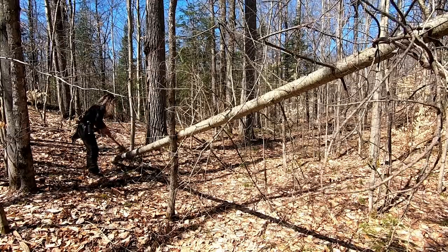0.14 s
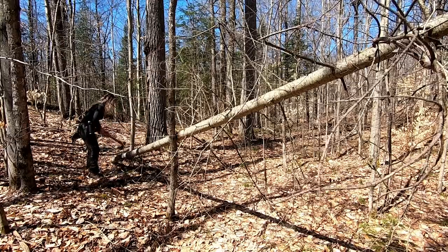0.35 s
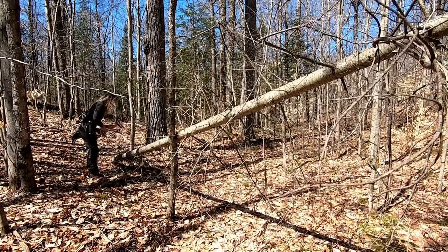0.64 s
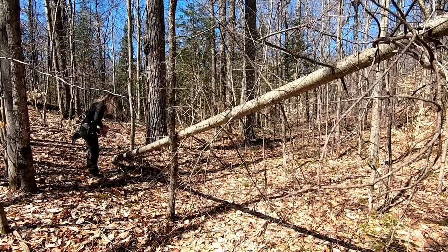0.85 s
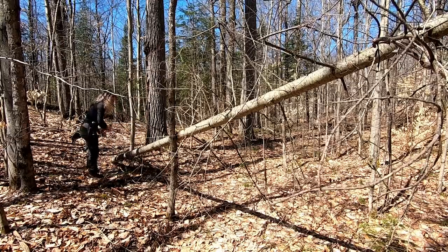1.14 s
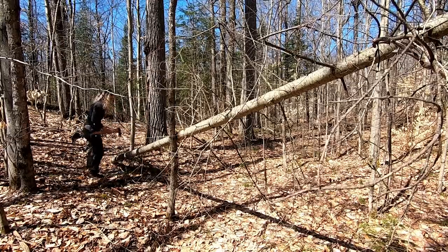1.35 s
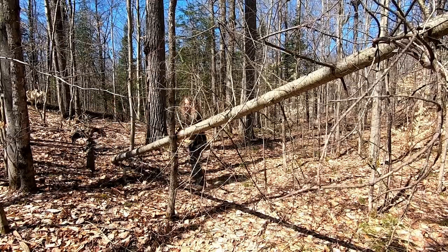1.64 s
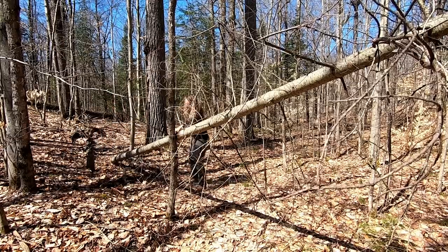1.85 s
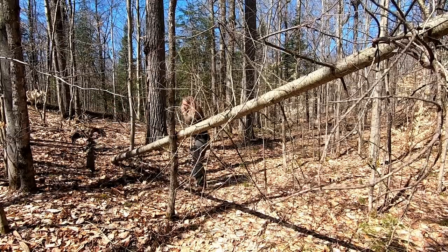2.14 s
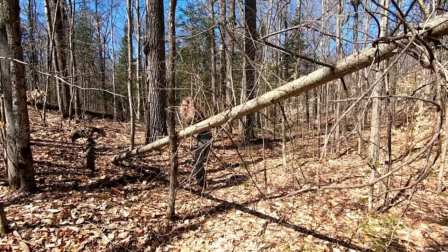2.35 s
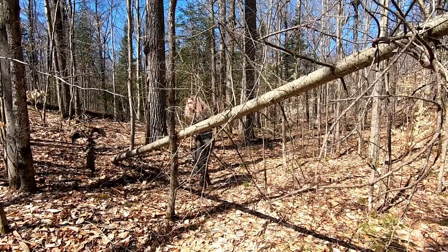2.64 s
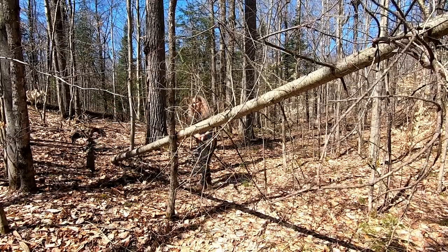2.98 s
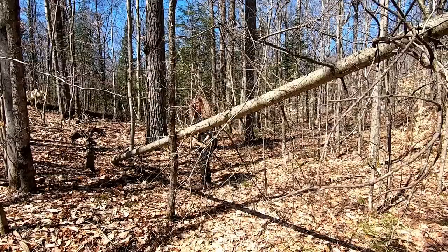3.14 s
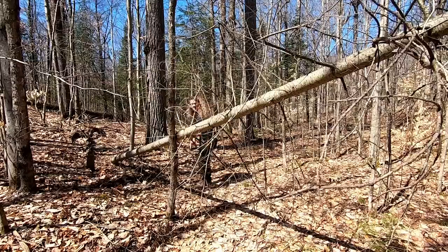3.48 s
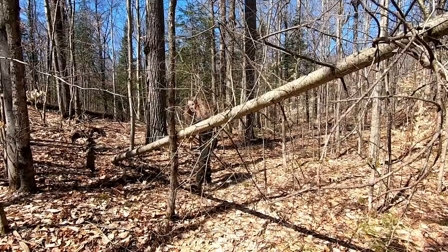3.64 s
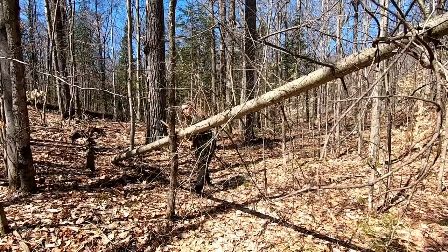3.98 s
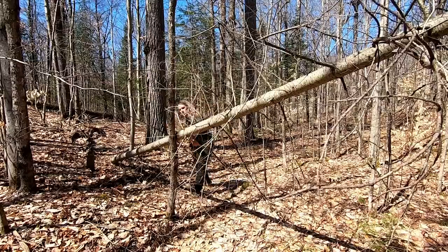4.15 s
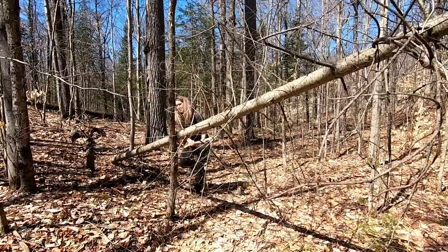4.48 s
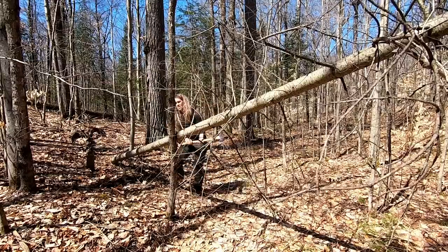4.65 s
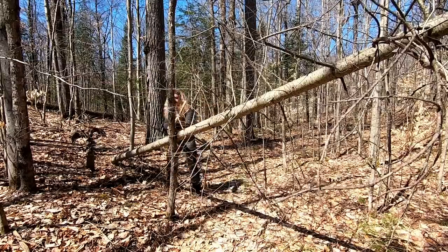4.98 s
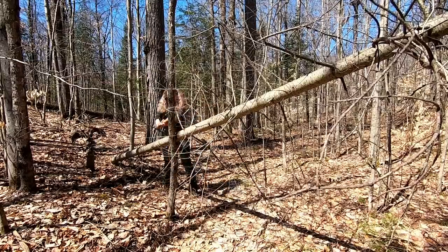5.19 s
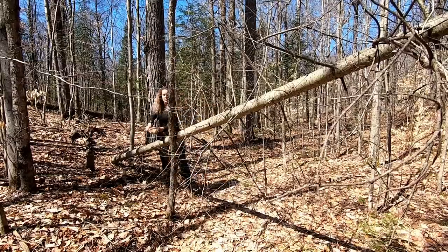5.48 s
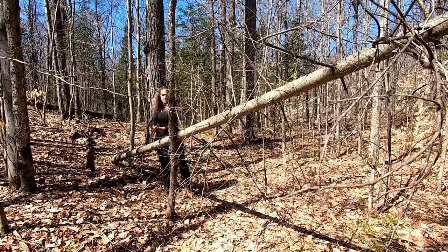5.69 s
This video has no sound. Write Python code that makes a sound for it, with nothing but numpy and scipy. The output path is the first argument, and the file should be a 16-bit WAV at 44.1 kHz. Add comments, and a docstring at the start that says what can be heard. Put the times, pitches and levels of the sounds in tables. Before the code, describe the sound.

In bare woods, a long dead tree is dragged through brush some metres from a stereo microphone. At 0.1 seconds a branch springs with a hollow pop and splinters, scattering briefly off ground and trunks. Leaf litter crunches and twigs tick, thinning to near quiet around 1 to 1.4 seconds. At 1.5 a crisp rustle and low wind enter; at 1.95 comes the loudest snap, hard, bright and clipped, leaving a faint thin high ring. Gusts rumble and thump toward the left from about 2 to 3.7 seconds while leaves keep scraping. A duller double crack lands at 2.74. Rustling eases near 3.8, then a lower crack with a woody shudder and trailing splinters comes at 4.32. Leaf crunch swells around 4.9, and a final cluster of snaps and tearing runs from 5.3 to 5.5, over rustling leaves and light wind to the end at about 5.8.

```python
"""A long dead tree is dragged through brush in bare woods, some metres from the microphones.
At once a branch springs and splinters; then twigs tick and leaf litter crunches under trunk and boots.
Near two seconds comes the loudest snap, a thin high ring after it; gusts buffet the two microphone ports.
More branches give way until the end. Damped swings make the pops, runs of impulses the tearing wood,
tiny grains the leaves and filtered noise the wind; ground and standing trunks scatter each snap."""
import sys
import numpy as np
from scipy import signal
from scipy.io import wavfile
from scipy.ndimage import uniform_filter1d

SR = 44100
rng = np.random.default_rng(int(sys.argv[2]) if len(sys.argv) > 2 else 0)


def waveform_to_disk(signal):
    """Save audio, clipped to [-1, 1], as 16-bit WAV at the path in sys.argv[1]."""
    frames = np.transpose(np.atleast_2d(signal))
    scaled = np.clip(frames, -1, 1) * 32767
    samples = np.round(scaled).astype(np.int16)
    wavfile.write(sys.argv[1], SR, samples)


N = 256662
TIME = np.arange(N) / SR


def gain_of(db):
    """Logarithmic level: decibels become an amplitude factor."""
    return 10 ** (np.asarray(db) / 20)


def evened(x):
    """Normalization: scales to an rms of 1."""
    return x / np.sqrt(np.mean(x ** 2) + 1e-20)


def read(points, hz):
    """Interpolation of a table along a logarithmic frequency axis."""
    f, value = np.transpose(points)
    return np.interp(np.log(hz + 1), np.log(f + 1), value)


def coloured(x, points):
    """Minimum-phase filtering: the Hilbert transform of the log gain supplies the phase of a causal filter."""
    size = 4096
    gain_db = read(points, abs(np.fft.fftfreq(size, 1 / SR)))
    log_gain = np.log(gain_of(gain_db))
    response = np.exp(np.conj(signal.hilbert(log_gain)))
    taps = np.fft.ifft(response).real[:size // 2]
    return np.apply_along_axis(lambda v: signal.oaconvolve(v, taps)[:len(v)], -1, x)


def panned(x, pan_db):
    """Interaural level difference: positive leans left, the mean of the two gains stays 1."""
    sides = gain_of(np.array([[.5], [-.5]]) * pan_db)
    return x * sides / sides.mean(0)


# spectrum of the side signal against the middle in scattered sound: frequency_hz [Hz], level_db [dB]
WIDTH = [(100, -23), (400, -17.5), (800, -3.5), (1300, -3), (3000, -8.5), (5500, -4), (8000, 3), (15000, 2)]


def widened(pair):
    """Decorrelation: two unrelated signals become a left and right that differ most in the treble."""
    middle, side = pair[0], coloured(pair[1], WIDTH)
    return np.array([middle + side, middle - side])


def add(mix, s, sound):
    """Superposition: mixes a sound in at its time."""
    part = mix[:, max(round(s * SR), 0):][:, :sound.shape[-1]]
    part += sound[..., :part.shape[1]]


def flick(t, hz, rise):
    """Damped oscillation: a sine whose envelope swells to 1 at the rise time and soon dies."""
    envelope = (t / rise * np.exp(1 - t / rise)) ** 2
    return envelope * np.sin(2 * np.pi * hz * t)


# sticks that give way and spring back:
# start_s [s], level_db [dB, envelope peak], pitch_hz [Hz], rise_ms [ms], left_over_right_db [dB]
SNAPS = [(0.075, -14.5, 1430, 0.33, -4), (0.0786, -7, 1054, 1.06, -5), (0.866, -39.5, 3680, 1.1, 4.5),
         (1.948, -16, 4400, 0.82, -2), (1.9513, -8, 1440, 0.2, 0), (1.954, 2.5, 4780, 0.16, 0),
         (1.9553, -2.5, 5450, 0.17, -6), (2.7387, -14.5, 795, 1.13, -2.5), (2.74, -19, 1287, 2.8, -7.5),
         (4.3216, -13, 854, 1.8, -4), (4.323, -17, 1303, 1.2, -10), (5.3102, -39, 4337, 0.33, 0),
         (5.3773, -19, 1100, 0.69, -5), (5.382, -10, 1035, 0.73, -3)]


def snaps():
    """Elastic release: each stick springs back with one short, heavily damped pop."""
    out, t = np.zeros((2, N)), np.arange(SR // 20) / SR
    for s, db, hz, rise_ms, pan_db in SNAPS:
        pop = gain_of(db) * flick(t, hz, rise_ms / 1000)
        add(out, s, panned(pop, pan_db))
    return out


# spectrum of breaking wood: frequency_hz [Hz], level_db [dB]
WOOD = [(150, 5.5), (480, 5), (850, 1.5), (1050, 1.5), (1250, -1.5), (1800, -2.5), (2400, -2), (3100, -2),
        (5500, -2), (9500, -6.5), (11500, -17), (16000, -30)]


def fracture(length, hz, treble_db, focus_db, fibres_per_s, grit, ring_db, stragglers, size=4096, count=110):
    """Brittle fracture: fibre impulses swell and thin out, filtered by the stick; loudest rms 1 at the middle."""
    t = np.arange(size) / SR
    breaks = (rng.random(size) < fibres_per_s / SR) * rng.uniform(0.2, 1, size)
    breaks[0] = 1.67  # the first break is the strongest
    fade = (1 - 0.5 * np.exp(-3 * t / length)) / (1 + (t / length) ** 3)
    # the last fibres part, about 500 a second at first
    late = stragglers * (rng.random(size) < 500 / SR) * rng.random(size) * np.exp(-t / 0.029)
    impulses = (breaks * fade + late) * rng.choice([-1, 1], (2, size))
    run = impulses + grit * fade * rng.standard_normal((2, size))

    # a narrow resonance on a slope that falls away from the stick's pitch
    f = np.geomspace(50, SR / 2, 200)
    octaves = abs(np.log2(f / hz))
    stick_db = ring_db / (1 + (octaves / 0.098) ** 2) - focus_db * octaves
    shape_db = read(WOOD, f) + stick_db + treble_db / (1 + (6000 / f) ** 4)
    sound = widened(coloured(run, np.transpose([f, shape_db])))
    loudest = np.sqrt(uniform_filter1d(sound.mean(0) ** 2, count).max())
    return sound / loudest


# wood fibres tearing in quick runs: start_s [s], level_db [dB, loudest rms], run_ms [ms],
# centre_hz [Hz], treble_db [dB], left_over_right_db [dB]
SPLINTERS = [(0.0837, -18.5, 2.7, 3400, 9, -1), (0.2244, -31.5, 3.7, 3620, 10.5, 4),
             (1.625, -32.5, 2.8, 1560, -13, 2), (1.955, -20.5, 1.8, 4600, 0.5, -4),
             (2.721, -34, 10.2, 2496, 0, -1), (2.738, -28, 2.86, 1593, -6, 0),
             (2.743, -23.5, 13.7, 1240, -11, -1), (2.7440, -19, 3.3, 4400, -1.5, -5),
             (4.32, -27, 7.6, 2000, -12.5, 4), (4.324, -16.5, 6.3, 3150, -6, -3.5),
             (4.3378, -28.5, 17.4, 3060, 2, 0), (4.3814, -28, 4.3, 2030, -3, -3),
             (4.3877, -24, 3.1, 3450, 4, -1), (4.7510, -30.5, 5.9, 3470, -2.5, -4.5),
             (4.9573, -25.5, 3.5, 3050, 2.5, -4), (5.197, -35.5, 3.8, 3460, 3, -1.5),
             (5.3087, -24.5, 2.4, 4900, -3.5, -1), (5.3826, -16.5, 5.4, 2500, 0, -1),
             (5.469, -21.5, 4.4, 3440, -6, 0.5), (5.4777, -21, 5.4, 3420, -1, -2),
             (5.4908, -25.5, 6.5, 3450, 2, -1)]


def splinters():
    """Progressive fracture: the fibres of a branch tear one after another."""
    out = np.zeros((2, N))
    for s, db, run_ms, hz, treble_db, pan_db in SPLINTERS:
        tear = fracture(run_ms / 1000, hz, treble_db, focus_db=3.5, fibres_per_s=4600,
                        grit=0.0807, ring_db=4, stragglers=0.23)
        add(out, s, panned(gain_of(db) * tear, pan_db))
    return out


# times when a broken limb shudders: start_s [s], level_db [dB, before the decay]
SHUDDERS = [(0.081, -30.5), (1.951, -35), (2.741, -36), (4.327, -23.5), (4.389, -37), (4.956, -40.5),
            (5.382, -35), (5.474, -36.5)]
# spectrum of the shaking limb: frequency_hz [Hz], level_db [dB]
LIMB = [(40, -21.5), (110, 7), (220, 6.5), (330, 4.5), (520, -16), (820, -17), (1020, -25), (1230, -10),
        (1600, -18.5), (2600, -20.5), (3100, -4), (3900, -15.5), (8000, -38)]


def shudders():
    """Damped vibration: a broken limb shakes with a dull knock that falls 60 dB in 0.2 s."""
    out, t = np.zeros((2, N)), np.arange(SR // 2) / SR
    for s, db in SHUDDERS:
        knock = evened(widened(coloured(rng.standard_normal((2, len(t))), LIMB)))
        onset = 1 - np.exp(-t / .0015)
        add(out, s, gain_of(db - 60 * t / 0.2) * onset * knock)
    return out


# the thin ring after the sharpest snap, one row:
# start_s [s], level_db [dB, before the decay], centre_hz [Hz], width_hz [Hz], t60_s [s]
RING = (1.955, -50, 8300, 110, .6)


def ring():
    """Narrow-band noise: a wavering high tone with exponential decay."""
    s, db, hz, width, t60 = RING
    t = np.arange(SR // 2) / SR
    band = signal.butter(2, [hz - width / 2, hz + width / 2], "band", fs=SR, output="sos")
    tone = evened(signal.sosfilt(band, rng.standard_normal(len(t))))
    out = np.zeros((2, N))
    add(out, s, gain_of(db - 60 * t / t60) * tone)
    return out


# strength of the steady rustle under the sliding trunk: time_s [s], level_db [dB]
SLIDE = [(0, -61.5), (0.1, -58), (0.5, -58), (0.62, -64.5), (1.2, -66.5), (1.46, -75.5), (1.6, -54),
         (1.92, -62.5), (2.5, -58), (2.85, -51.5), (3.2, -57), (3.5, -58), (3.82, -66.5), (4.15, -54.5),
         (4.66, -57.5), (5.1, -50.5), (5.6, -48.5), (5.82, -55)]
SLIDE_CRUNCH_DB, SLIDE_CRISP_DB = -7, -8  # dB against the rustle
# heaves and steps that crush the leaves: height_s [s], rustle_db [dB], swell_s [s], fade_s [s],
# crunch_db [dB against the rustle], crisp_db [dB against the rustle]
CRUSHES = [(0.085, -43, 0.024, 0.089, 2.5, -14), (0.18, -43.5, 0.069, 0.057, -20, -6.5),
           (1.479, -49, .005, 0.15, -3, 0), (1.66, -43.5, 0.071, .15, -10.5, -4),
           (2.06, -47, 0.041, 0.12, -9, -5.5), (2.23, -48, 0.096, 0.083, -6.5, -4.5),
           (2.359, -47, 0.026, 0.019, -8, -13), (2.68, -51.5, .08, 0.098, -9, -8),
           (2.74, -51.5, 0.024, 0.077, 6, -4), (2.98, -52, 0.079, 0.041, -17, -5),
           (3.285, -48, 0.018, 0.07, -7.5, -8.5), (4.04, -48, 0.071, .09, -5.5, -8),
           (4.335, -54, 0.028, 0.19, 0.5, -1.5), (4.754, -44.5, 0.036, 0.09, -4, -6.5),
           (4.936, -37.5, 0.032, 0.028, -5, -3.5), (5.205, -44, 0.024, 0.029, -9.5, -6),
           (5.305, -50.5, 0.0087, 0.018, -3, 2), (5.385, -43, 0.014, 0.056, -4, 2),
           (5.47, -42, 0.027, 0.11, -13, -3)]


def pressure():
    """Power summation of the slide and each crush, for rustle, deep crunch and crisp edge."""
    slide = gain_of(np.interp(TIME, *np.transpose(SLIDE)))
    power = (gain_of([[0], [SLIDE_CRUNCH_DB], [SLIDE_CRISP_DB]]) * slide) ** 2
    for s, db, swell_s, fade_s, crunch_db, crisp_db in CRUSHES:
        # bell-shaped swell, exponential fade
        shape = np.exp(-np.where(TIME < s, ((TIME - s) / swell_s) ** 2, (TIME - s) / fade_s))
        power += (gain_of(db) * gain_of([[0], [crunch_db], [crisp_db]]) * shape) ** 2
    return np.sqrt(power)


# spectrum of dry leaves: frequency_hz [Hz], level_db [dB]
LEAVES = [(350, -21.5), (600, -22.5), (790, -6), (1180, -10), (2010, -4), (2540, -0.5), (3080, 1.5),
          (3830, 1.5), (4280, -0.5), (4780, -0.5), (7020, -5), (8860, -5.5), (11700, -16.5), (13400, -19),
          (16000, -28.5)]


def crackle(lo_hz, hi_hz, per_s, spread_db, clump_db, hiss, count=8):
    """Granular emission: leaves buckle in clumps of tiny damped grains over the hiss of their rubbing."""
    out = np.zeros((2, N))
    for hz in np.geomspace(lo_hz, hi_hz, count):
        at = rng.integers(0, N, int(per_s * N / SR / count))
        pitch = hz * rng.uniform(0.848, 1.15, (len(at), 1))
        extra_db = spread_db * np.minimum(rng.exponential(1, (len(at), 1)), 4)
        height = hz ** .5 * gain_of(extra_db)
        steps = np.arange(int(2 * np.pi * SR / hz))
        grains = height * flick(steps / SR, pitch, 1.4 / pitch)
        channel = rng.integers(0, 2, (len(at), 1))
        np.add.at(out, (channel, (at[:, None] + steps) % N), grains)
    band = signal.butter(4, [lo_hz, min(hi_hz, SR / 2 - 1)], "band", fs=SR, output="sos")
    rub = signal.sosfilt(band, rng.standard_normal((2, N)))
    slow_noise = uniform_filter1d(uniform_filter1d(rng.standard_normal(N), size=400), size=200)
    clumps = gain_of(clump_db * evened(slow_noise))
    leaves = widened(coloured((evened(out) + hiss * evened(rub)) * clumps, LEAVES))
    return leaves / np.std(leaves.mean(0))


def litter(rustle, crunch, crisp):
    """Amplitude modulation: the pressure of trunk and boots drives three bands of leaf crackle."""
    rustle = rustle * crackle(1930, 6660, per_s=2000, spread_db=5.5, clump_db=1.5, hiss=1.0)
    crunch = crunch * crackle(380, 1830, per_s=1600, spread_db=4, clump_db=3.0, hiss=1.0)
    crisp = crisp * crackle(7000, 14500, per_s=4200, spread_db=3.0, clump_db=2.5, hiss=0.32)
    return panned(rustle, pan_db=-1.2) + panned(crunch, pan_db=-4.0) + panned(crisp, pan_db=-8.0)


# lesser twigs: rate, median pitch [Hz] and its spread; level [dB] at the median rustle, its spread,
# and the dB gained per dB of rustle
STRAY_PER_S, STRAY_HZ, STRAY_OCTAVES = 14, 3600, 0.32
STRAY_DB, STRAY_SPREAD_DB, STRAY_FOLLOW = -46.5, 3.5, 0.87


def stray_twigs(rustle):
    """Stochastic breakage: rows like those of TWIGS at random, louder where leaves are pressed harder."""
    count = int(STRAY_PER_S * N / SR)
    at = ((np.arange(count) + rng.random(count)) / count * N).astype(int)
    size, pitch, side = rng.standard_normal((count, 3)).T
    rustle_db = 20 * np.log10(rustle[at] / np.median(rustle))
    db = STRAY_DB + STRAY_SPREAD_DB * size + STRAY_FOLLOW * rustle_db
    return list(zip(at / SR, db, STRAY_HZ * 2 ** (STRAY_OCTAVES * pitch), 3 * side))


# the louder twigs: start_s [s], level_db [dB, loudest rms], pitch_hz [Hz], left_over_right_db [dB]
TWIGS = [(0.208, -36, 3340, 6), (0.275, -40, 3080, -1), (0.508, -40, 3650, -2), (0.727, -44.5, 3230, -3),
         (0.752, -46, 3260, -1), (0.81, -50, 1500, -4), (1.177, -49.5, 2400, 0), (1.203, -38.5, 5120, -3),
         (1.475, -45.5, 4400, 6), (1.494, -36, 5700, 4), (1.707, -39, 3270, 6), (2.108, -33, 4000, 7),
         (2.424, -41.5, 6200, -5), (2.559, -38, 3400, -2), (2.798, -33.5, 3360, -2),
         (2.981, -34.5, 1940, -4), (3.272, -35, 2413, -6), (3.998, -36, 2670, 2), (4.031, -28.5, 4210, -1),
         (4.237, -41, 3550, -3), (4.712, -34, 7600, 0), (4.799, -36, 2570, -10), (4.978, -34.5, 2800, -2),
         (5.207, -32, 3896, -10), (5.526, -32, 3480, 0.5)]


def twigs(rustle):
    """Small-scale fracture: thin twigs break in a few fibres, each at its own pitch."""
    out = np.zeros((2, N))
    for s, db, hz, pan_db in list(TWIGS) + stray_twigs(rustle):
        tick = fracture(0.0018, hz, treble_db=2.0, focus_db=5.5, fibres_per_s=910,
                        grit=.06, ring_db=6.0, stragglers=.06)
        add(out, s, panned(gain_of(db) * tick, pan_db))
    return out


# share of the brush sound that is a scrape straight ahead: time_s [s], share [0-1]
AHEAD = [(1.44, 0.6), (1.48, 1), (1.93, 0.46), (2.0, 0.36), (2.4, 0.26)]


def ahead(x, bounce_s=0.001025, ground=0.26):
    """Comb filtering: sound from straight ahead reaches both ports alike, directly and off the ground."""
    s, share = np.transpose(AHEAD)
    share = np.clip(np.interp(TIME, s, share), 0, 1)
    direct = x.mean(0)
    combed = direct + ground * np.interp(TIME - bounce_s, TIME, direct)
    return (1 - share) * x + share * combed


# reverberation time of the far trunks: frequency_hz [Hz], t60_s [s]
WOODS = [(150, 0.72), (900, 0.68), (3500, 0.66), (8000, 0.51), (15000, 0.47)]


def woods(x, near_db, far_db, near_t60=0.24, size=128):
    """Diffuse scattering: ground and brush return the energy soon, far trunks for up to a second."""
    hz, at, z = signal.stft(x.mean(0), SR, nperseg=size)
    delay = at[at < 1]
    late = delay > .002  # nothing returns in the first 2 ms
    near = 10 ** (-6 * delay / near_t60) * late
    far = 10 ** (-6 * delay / read(WOODS, hz)[:, None]) * late
    near_power = gain_of(near_db) ** 2 * near / near.sum()
    far_power = gain_of(far_db) ** 2 * far / far.sum(1, keepdims=True)
    returns = near_power + far_power
    energy = abs(signal.fftconvolve(abs(z) ** 2, returns, axes=1)[:, :len(at)])
    # noise carries the returned energy, band by band
    diffuse = signal.stft(rng.standard_normal((2, N)), SR, nperseg=size)[2]
    scattered = diffuse / np.std(diffuse) * np.sqrt(energy)
    return widened(signal.istft(scattered, SR, nperseg=size)[1][:, :N])


# gusts that swell and drop again: height_s [s], level_db [dB], half_s [s], left_over_right_db [dB]
GUSTS = [(0.11, -39, 0.051, -1.5), (0.29, -46.5, 0.03, -15), (1.511, -39, 0.022, 1), (1.614, -31, 0.028, 0),
         (1.772, -32.5, .09, 0), (2.058, -33, 0.043, 7), (2.229, -30, 0.089, 8), (2.491, -27.5, .12, 9),
         (2.717, -33.5, 0.078, 11), (3.21, -35, 0.0398, 12.5), (3.479, -28.5, .1, 13),
         (3.679, -30, 0.054, 5), (4.143, -47, 0.031, 6), (4.36, -40, 0.0516, -5), (4.706, -40.5, 0.025, -2),
         (4.951, -40.5, 0.041, -7), (5.075, -35.5, 0.033, -9.5), (5.23, -39, 0.038, -5.5),
         (5.68, -33, 0.056, -3), (5.81, -36.5, 0.042, 8.5)]
# the light wind between gusts: time_s [s], level_db [dB]
DRAUGHT = [(0, -46.5), (0.25, -53.5), (0.42, -72), (1.44, -76), (1.52, -46), (1.9, -39), (2.9, -48),
           (3.9, -50), (4.55, -52), (5.82, -52)]
DRAUGHT_PAN_DB = -3  # left over right


def buffeting():
    """Power summation: wind level at each port in dB, bell-shaped gusts on top of the draught."""
    draught = gain_of(np.interp(TIME, *np.transpose(DRAUGHT)))
    power = panned(draught, DRAUGHT_PAN_DB) ** 2
    for s, db, half_s, pan_db in GUSTS:
        gust = gain_of(db) * np.exp(-((TIME - s) / half_s) ** 2 / 2)
        power += panned(gust, pan_db) ** 2
    return 10 * np.log10(power)


# spectrum of the turbulence at usual speed: frequency_hz [Hz], level_db [dB]
BREEZE = [(8, -13), (25, -6), (55, -7), (90, -4), (130, -12), (190, -20.5), (300, -33), (700, -106.5)]
# single strong eddies that thump the windward port: start_s [s], level_db [dB, envelope peak], pitch_hz [Hz]
EDDIES = [(2.131, -22.5, 93), (2.484, -16, 105), (2.541, -22.5, 196), (3.404, -24, 189.2),
          (3.443, -18.5, 149.2), (3.466, -17.5, 110), (3.527, -21.5, 190), (3.671, -21.5, 98),
          (3.689, -27, 137)]
EDDY_PAN_DB = 18  # left over right


def wind(usual_db=-31.5, db_per_octave=12, flutter_db=2.08):
    """Advected turbulence: a stronger gust carries it past each port faster, so higher in pitch."""
    out, t = np.zeros((2, N)), np.arange(SR // 8) / SR
    for port, level_db in zip(out, buffeting()):
        slow_noise = uniform_filter1d(uniform_filter1d(rng.standard_normal(N), size=1100), size=500)
        lumpy_db = level_db + flutter_db * evened(slow_noise)
        speed = np.clip(2 ** ((lumpy_db - usual_db) / db_per_octave), .75, 1.45)
        field = evened(coloured(rng.standard_normal(2 * N), BREEZE))
        port += np.interp(np.cumsum(speed), np.arange(2 * N), field) * gain_of(lumpy_db)
    for s, db, hz in EDDIES:
        thump = gain_of(db) * flick(t, hz, 0.57 / hz)
        add(out, s, panned(thump, EDDY_PAN_DB))
    return out


# spectrum of the steady hush: frequency_hz [Hz], level_db [dB]
AIR = [(20, -6), (90, -19.5), (160, 8.5), (300, 0.5), (600, -11), (1500, -18.5), (4000, -16.5),
       (10000, -19.5), (15000, -63)]
AIR_DB = -61.5  # rms level


def air():
    """Diffuse field: unrelated noise at each port is the faint steady hush of the woods all around."""
    return gain_of(AIR_DB) * evened(coloured(rng.standard_normal((2, N)), AIR))


def scene():
    """Superposition of breaking wood in its surroundings, leaves and wind."""
    rustle, crunch, crisp = pressure()
    pops, tears = snaps(), splinters()
    brush = litter(rustle, crunch, crisp) + twigs(rustle)
    # the pops feed the scattering far less than the tears
    breaks = pops + tears + woods(tears + gain_of(-17) * pops, near_db=-12, far_db=-16.5)
    brush = brush + woods(brush, near_db=-3.5, far_db=-14.5, near_t60=0.088)
    return breaks + ahead(brush) + shudders() + ring() + wind() + air()


EDGE_HZ = 16000


def record(dry):
    """Clipping and band limiting: peaks flatten at 0.95, then a linear-phase low-pass ends the treble."""
    edge = signal.firwin(255, EDGE_HZ, window=("kaiser", 8), fs=SR)
    return signal.oaconvolve(np.clip(dry, -.95, .95), edge[None], "same")


dry = scene()
out = record(dry)
waveform_to_disk(out)
```